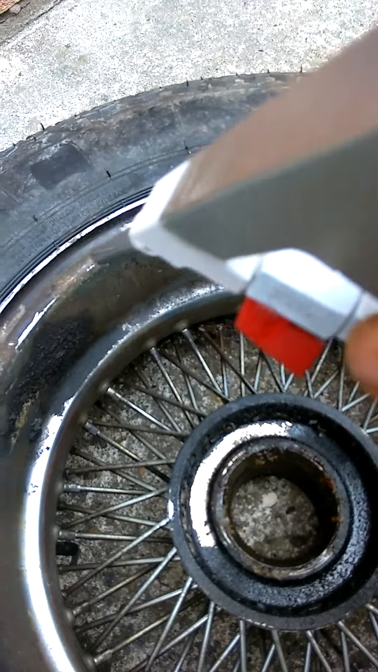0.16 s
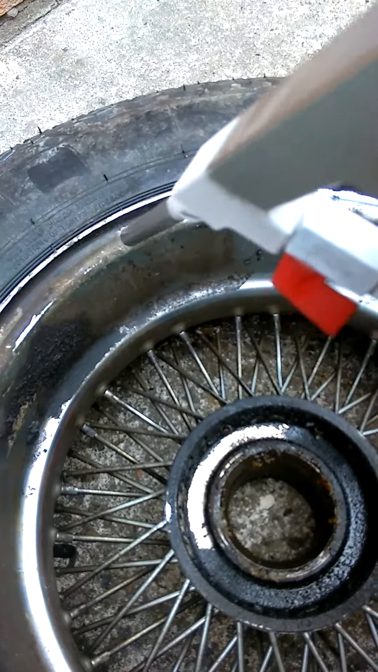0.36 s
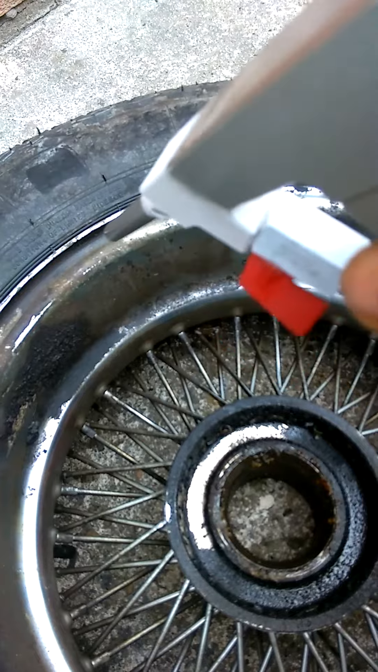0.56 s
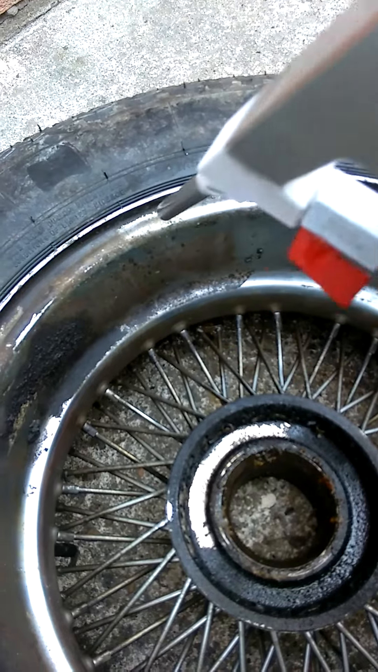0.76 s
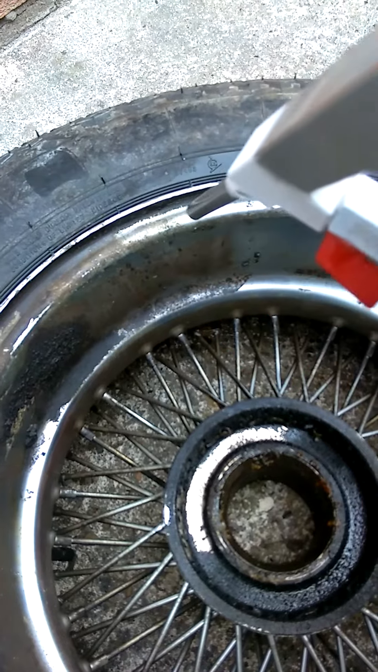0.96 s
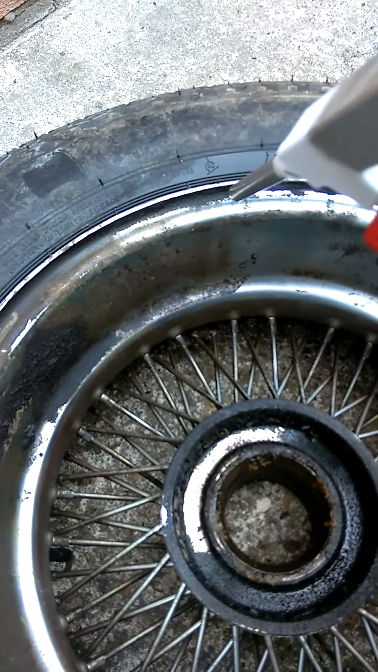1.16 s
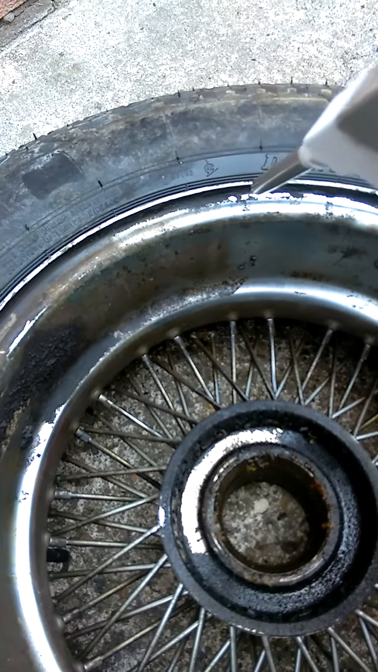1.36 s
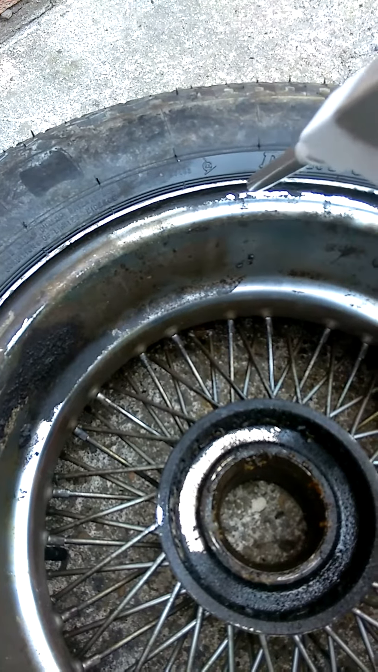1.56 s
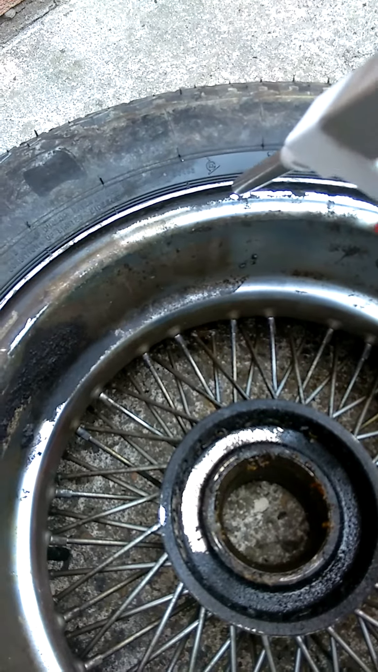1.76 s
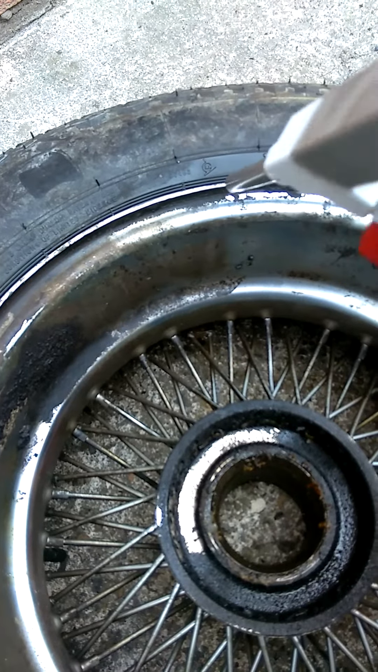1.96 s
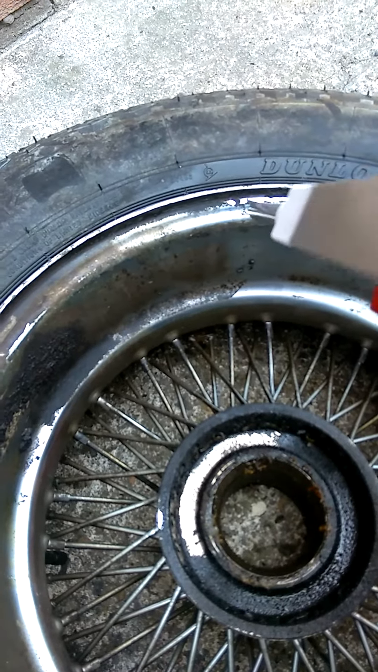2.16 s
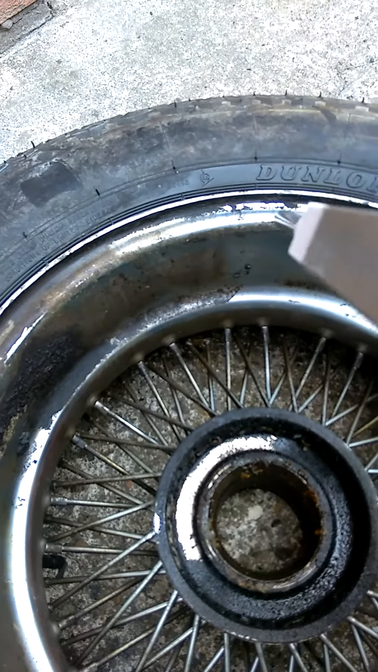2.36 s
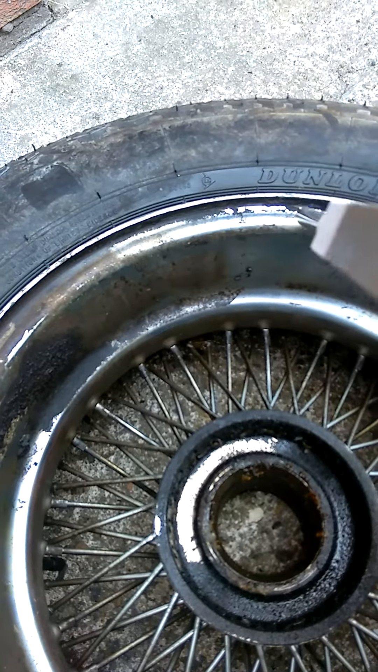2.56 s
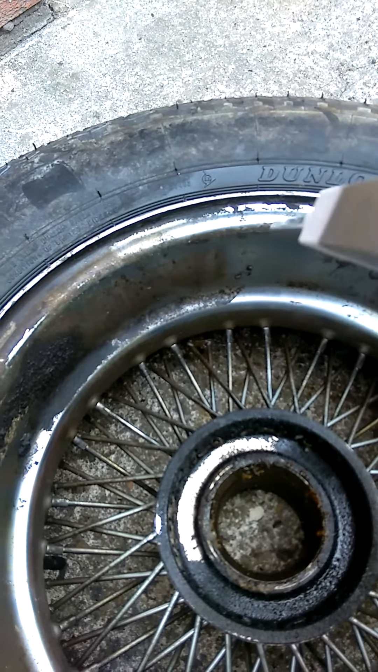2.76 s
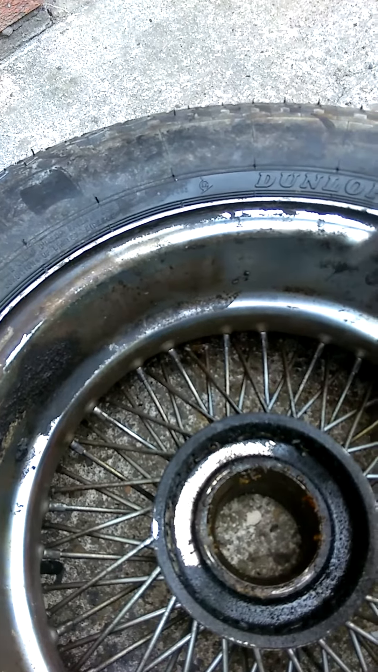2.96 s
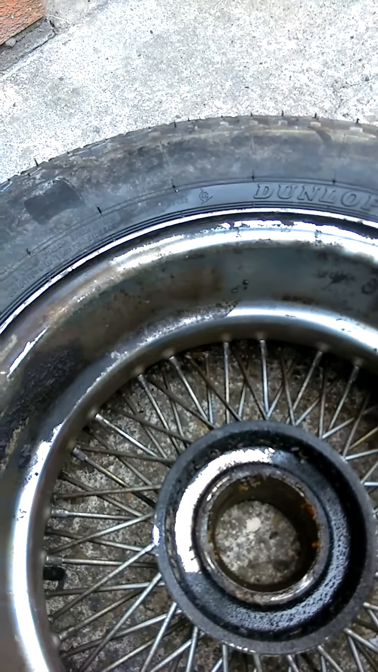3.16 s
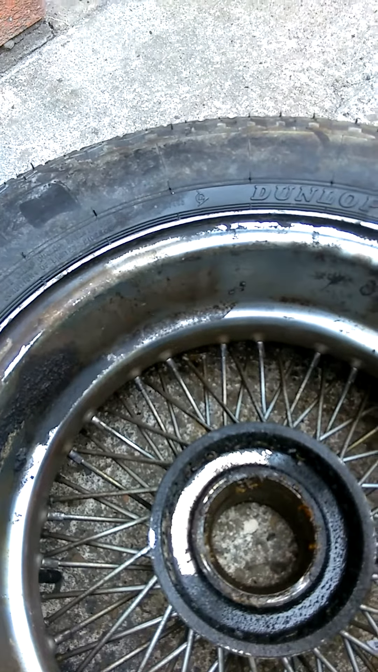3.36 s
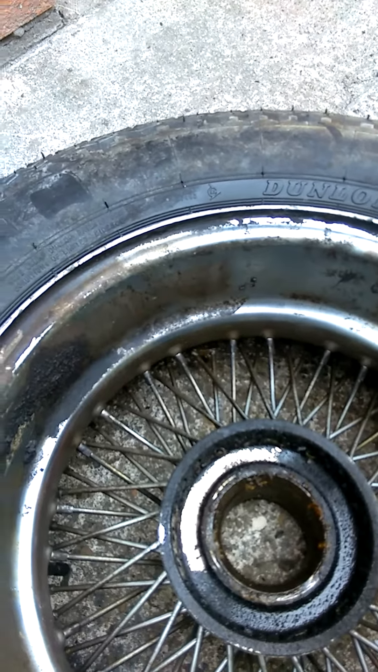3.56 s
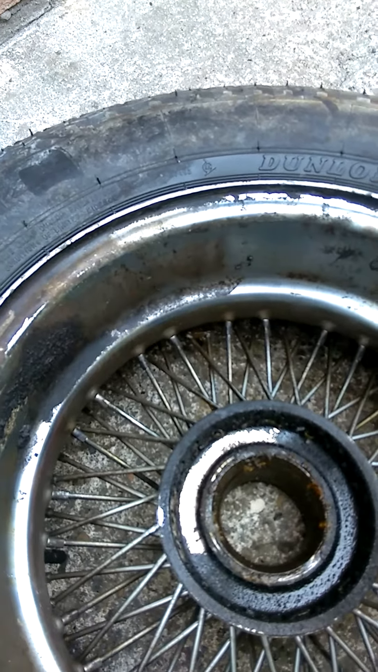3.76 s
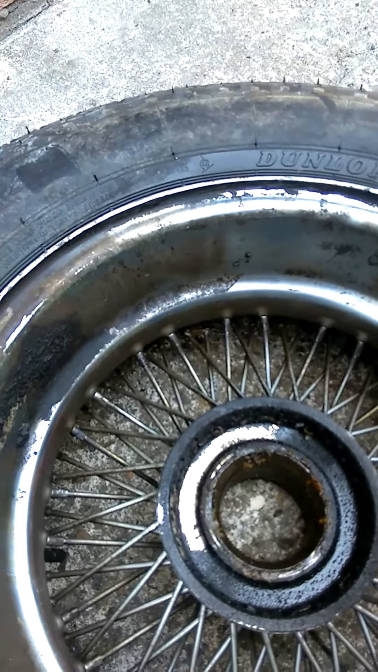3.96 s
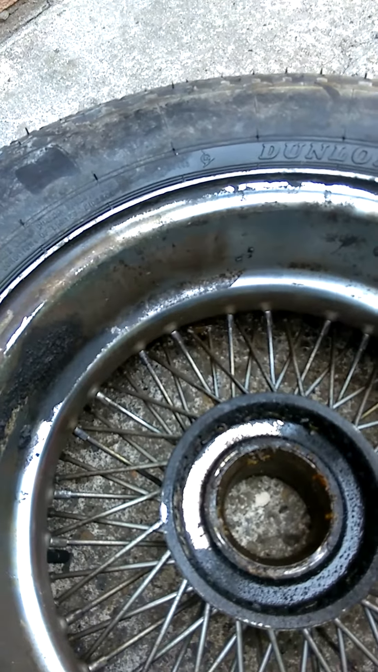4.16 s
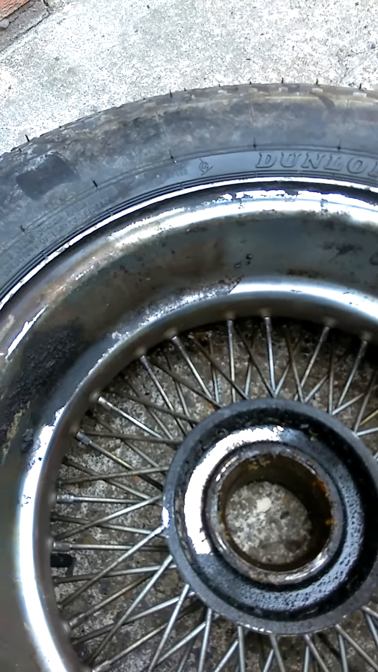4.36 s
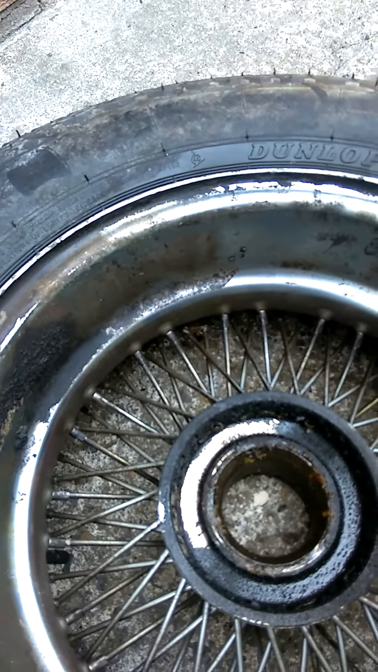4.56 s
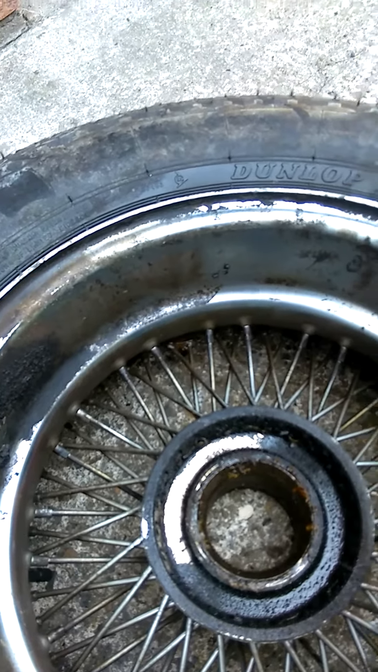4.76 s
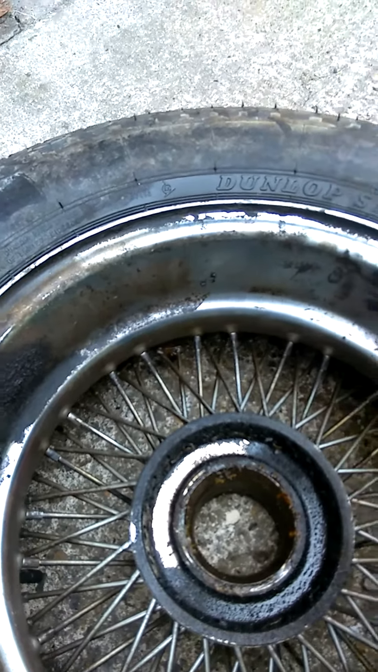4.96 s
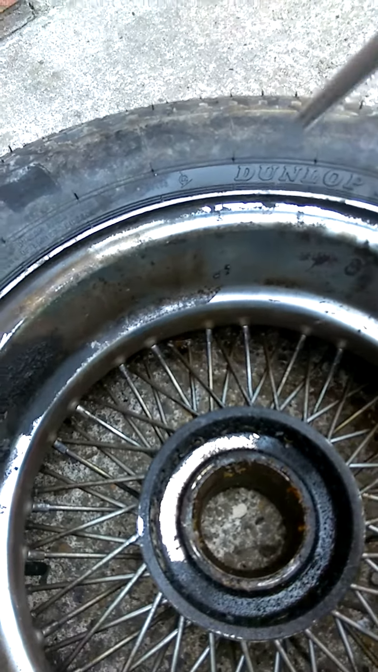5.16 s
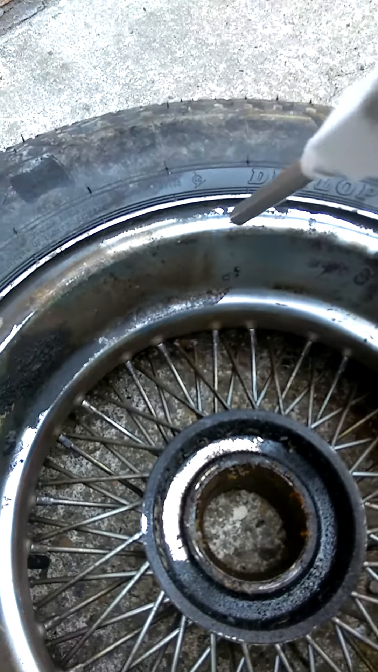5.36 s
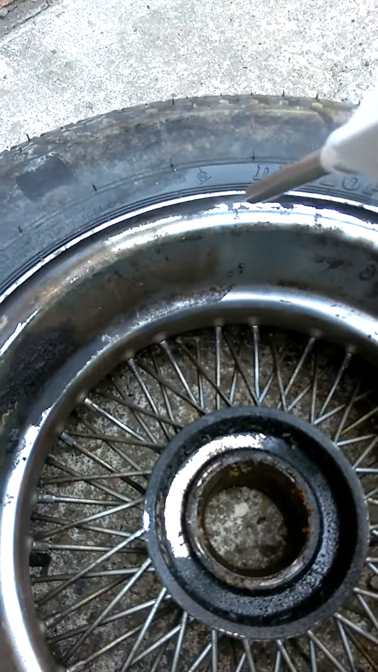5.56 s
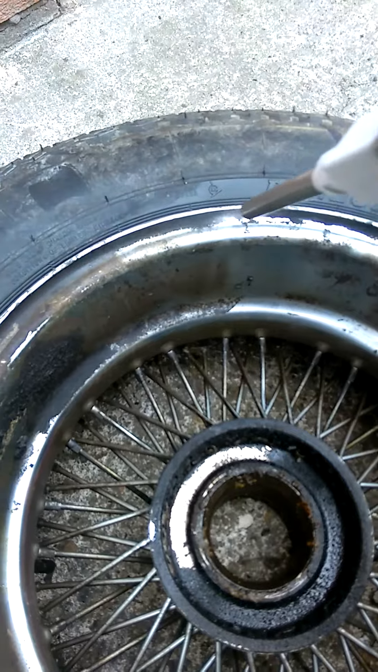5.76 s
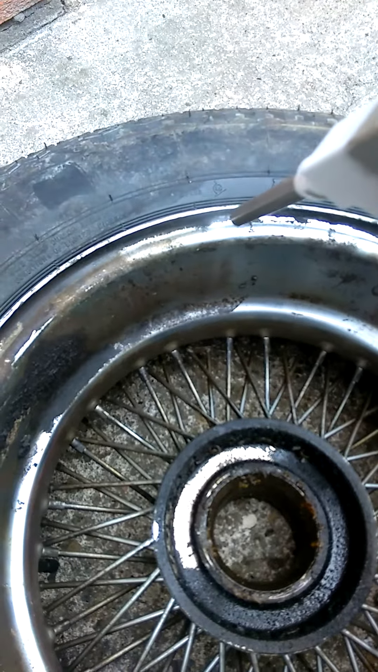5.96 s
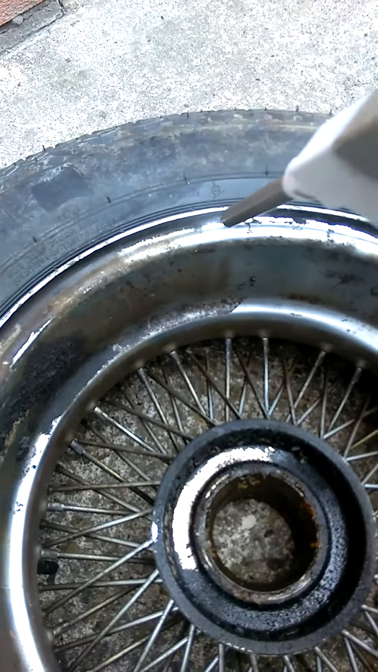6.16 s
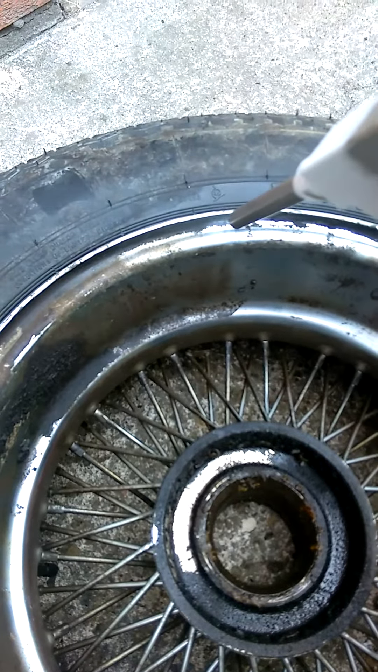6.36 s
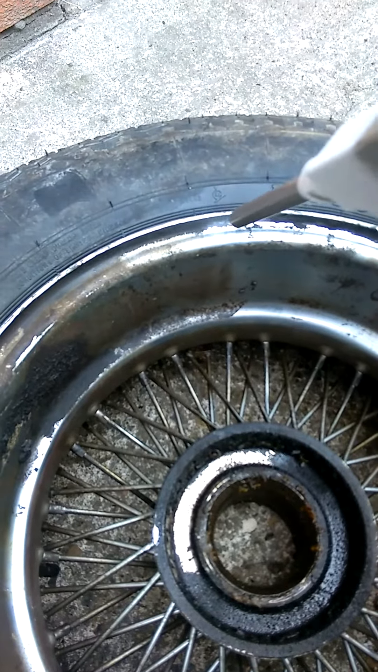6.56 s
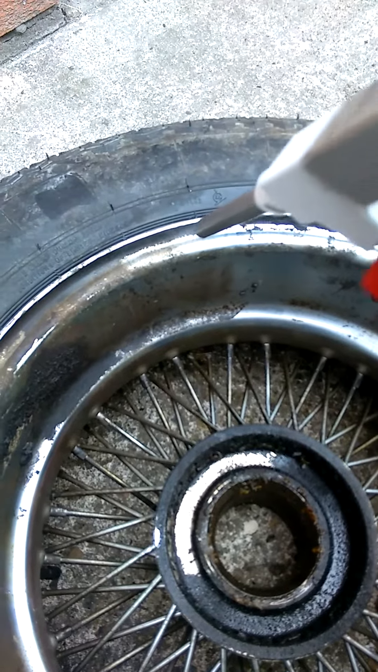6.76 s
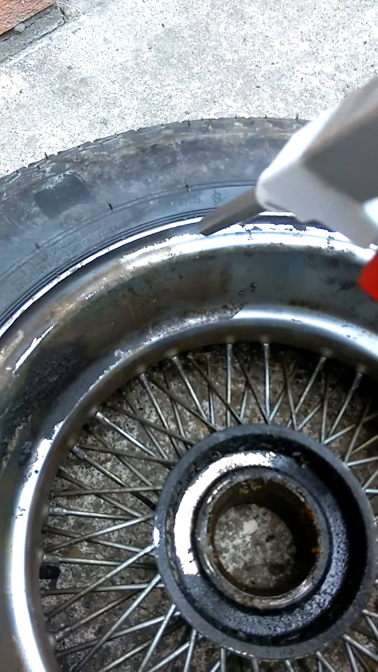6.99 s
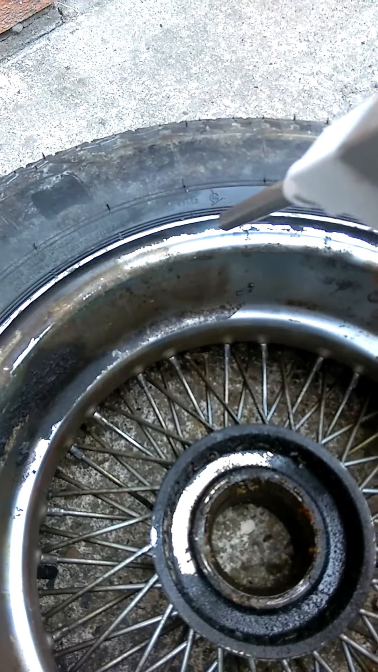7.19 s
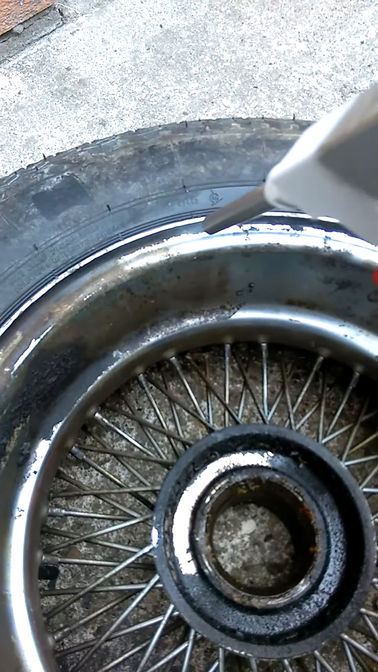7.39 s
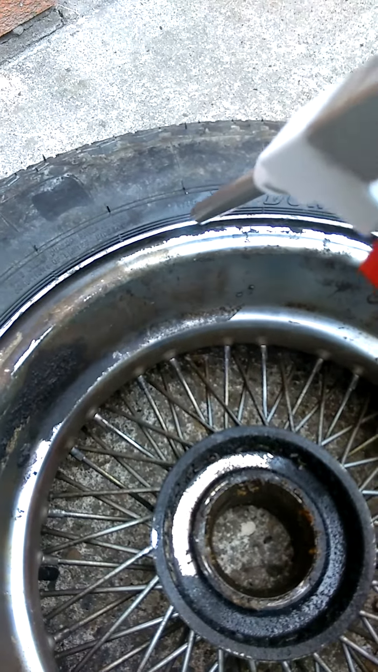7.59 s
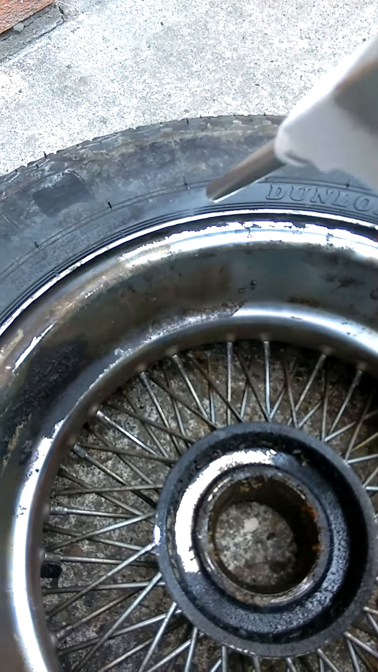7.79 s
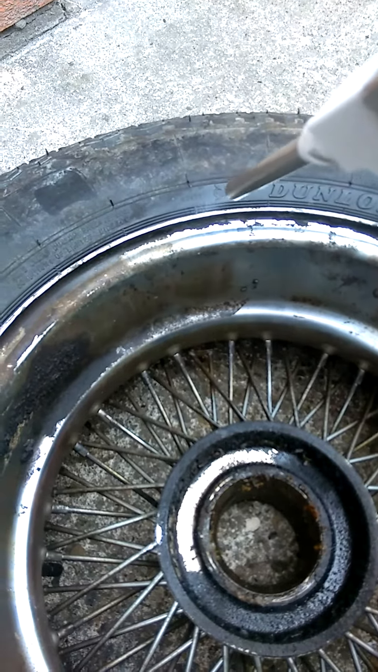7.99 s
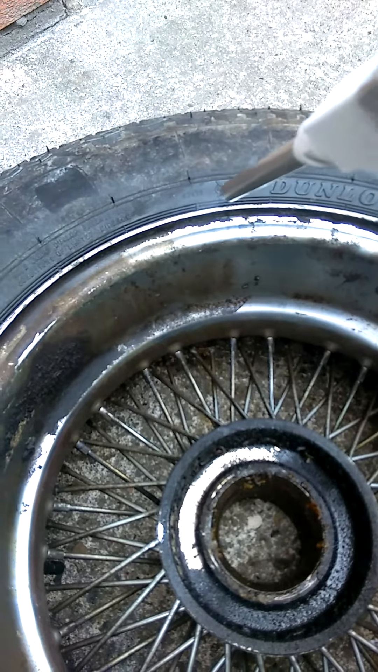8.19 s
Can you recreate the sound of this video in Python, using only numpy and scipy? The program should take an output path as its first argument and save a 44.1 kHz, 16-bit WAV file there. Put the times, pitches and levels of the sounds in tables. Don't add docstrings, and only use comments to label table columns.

```python
import sys
import numpy as np
from scipy import signal
from scipy.io import wavfile
from scipy.ndimage import uniform_filter1d

SR = 44100
rng = np.random.default_rng(int(sys.argv[2]) if len(sys.argv) > 2 else 0)


def natural_amplitude(level_db):
    exponent = np.asarray(level_db, float) / 20
    return 10 ** exponent


def generate_wav(sig):
    pcm = np.round(np.clip(np.atleast_2d(sig).T, -1, 1) * 32767).astype(np.int16)
    wavfile.write(sys.argv[1], SR, pcm)


N = 362943

# (opens [s], share of rim colour [0-1], whistle of the free jet [dB])
PULLS = [
    (0, 0.1, 3),
    (4.74, 0, 1),
    (5.29, 0.96, -1),
]
# (time [s], force over gain-control knee [dB], aim into rim hollow as roar [dB],
# sizzle [dB], left minus right [dB])
STROKES = [
    [(0.05, 3, -7, 3, 0), (0.36, 4.5, -11, 1.5, -0.5), (0.6, 3.5, -7, 2.5, -0.5), (0.95, 7, -14, 0, 0.5),
     (1.3, 5.5, -10.5, 1.5, 3.5), (1.52, 7.5, -9.5, 0, -0.5), (1.71, 3.5, -7, 3, -0.5),
     (1.9, 8.5, -8, 0.5, 0), (2.2, 6, -11.5, 0, 0), (2.55, 6, -15.5, .5, 0), (2.78, 7.5, -13, -1, 1),
     (2.84, 1.5, -9, 1.5, 1), (2.93, 4, -16.5, 1, 0)],
    [(4.76, -24, 0, 3, 1), (4.816, -6, -9, -2, 4), (4.85, 0.5, -11, 2, 2), (4.885, 6, -20, 10.5, 3),
     (4.905, 13, -16, 5, 4), (4.915, 2, -23, 6, 5), (4.94, 2, -18, 3, 0), (4.965, -2.5, -13, -4, -1),
     (4.992, -12, -10, 1, 0)],
    [(5.295, 3.5, 1, 5, -2), (5.32, 8, -8.5, 3.5, -1), (5.41, 11.5, -6.5, 1.5, -2.5),
     (5.57, 10.5, -9, 2.5, -3), (5.67, 13.5, -6.5, -1, -4.5), (5.8, 9.5, -5, 2, -2),
     (6.3, 8.5, -6.5, 2.5, -2.5), (6.85, 2, -1.5, 2, -1), (7.46, 0, 1, 3, -2), (7.66, 5, -3.5, 0.5, -2.5),
     (7.9, -1.5, -2, 3, -1.5), (8.05, 4, -5, 2, -1.5), (8.22, 5, -8.5, -2, -2.5)],
]
# (time [s], depth [dB])
STUTTERS = [
    (0.2, 1),
    (0.5, 3.5),
    (2.052, 1),
    (5.77, 1.5),
    (6.458, 3),
]
# (frequency [Hz], left [dB per Hz], right [dB per Hz])
JET_COLOUR = [(540, -89, -67.5), (830, -48, -53.5), (1310, -54, -50), (1870, -47, -55),
              (2413, -51.5, -42.5), (2790, -50.5, -55), (3290, -52, -48), (3770, -62.5, -50),
              (5850, -54.5, -60), (6460, -57.5, -54.5), (8900, -55.5, -54), (10700, -50.5, -55.5),
              (11500, -52, -51), (15700, -54, -56.5)]
# (frequency [Hz], share common to both ports [0-1])
JET_COHERENCE = [(400, .7), (1500, .97), (2200, .9), (2600, .75), (3500, .66), (6600, .66), (7300, .45),
                 (8000, .72), (12000, .76), (15000, .68)]
# (frequency [Hz], width [Hz], left [dB], right [dB])
RIM_MODES = [(1170, 130, -5, -1), (1425, 114, 9, 1.5), (1846, 134, -3.5, -11), (2100, 100, 9, 2.5),
             (2820, 110, 9, -4), (3370, 420, -3.5, -1.5), (4500, 700, 1, 1), (5600, 150, -1, -1),
             (6420, 420, 0, 0)]
LEFT_PATHS = [(18, 1, .4), (12, .7, .45), (21, -.6, .45), (91, .65, .5), (97, -.75, .5), (94, .5, .6),
              (80, .35, .6), (102, .35, 1), (135, .3, 2)]
RIGHT_PATHS = [(0, 1, .15), (47, .3, 1.5), (78, -.35, 1), (115, .35, 1.5), (30, .25, 1.5)]
# (time [s], factor [ratio])
PATH_SPREAD = [(2.9, 1), (4.7, .28), (5.1, .28), (5.28, 1)]
# (time [s], frequency [Hz], share [0-1])
TYRE_GAP = [(.05, 3300, .2), (.14, 3300, .9), (.3, 3200, 0), (.65, 2900, .2), (.78, 2720, .8),
            (.95, 2850, .2), (1.22, 2960, .95), (1.8, 2960, .75), (2.1, 2950, .35), (2.55, 2930, .85),
            (2.8, 2940, .7), (2.9, 2940, .2), (8.2, 2900, .25)]
# (start [s], end [s], frequency [Hz], left [dB], right
# [dB])
GLINTS = [(2.5, 2.82, 5050, 3, 3), (.9, 1.45, 10200, -2, 0), (.8, 1.3, 12800, -2, -2),
          (1.2, 1.75, 11200, 5, 5), (1.4, 1.68, 8300, -3, -2), (1.72, 2, 8200, 3, 2),
          (1.2, 1.75, 13200, 3, 3), (1.15, 1.5, 6300, 2, 2), (2.1, 2.5, 9200, 3, 0),
          (2.1, 2.5, 12300, 0, 3), (2.45, 2.9, 11500, 3, 3), (2.5, 2.85, 6800, 3, 0),
          (.2, .5, 6000, -3, -3), (4.75, 5, 13800, 4, 2), (4.75, 5, 11000, -3, -1),
          (4.75, 5, 15200, -3, -3), (4.75, 5, 2350, -3, -4), (4.75, 5, 4300, 4, 2), (4.75, 5, 3700, 3, 1),
          (4.75, 4.92, 2700, 4, 3), (4.75, 5, 3150, 2, 1), (5.29, 5.7, 15200, -3, -3),
          (5.29, 6.4, 13600, 2, 2), (5.29, 6.4, 10600, -3, -2), (5.9, 6.4, 11800, 1, 0),
          (6.3, 6.6, 10800, -4, -3), (5.6, 6.5, 9000, 2, 2), (6.7, 7.2, 14200, 3, 1),
          (6.6, 7.3, 12300, 2, 2), (7.8, 8.1, 10500, 4, 0), (7.5, 8.2, 9700, -3, -2),
          (6.5, 8.3, 3500, 1, 2), (6.5, 8.3, 4100, 1, 2), (6.5, 7.8, 2050, -2, 0), (7.7, 8.3, 13600, 2, 2),
          (7.5, 8.3, 4600, 3, 3), (5.35, 6.2, 1420, -2.5, -1.5), (5.35, 6.2, 2050, -2, -1),
          (2.825, 2.855, 5100, -14, -16), (2.885, 2.95, 4450, -14, -18)]
# (time [s], level [dB], frequency [Hz], t60 [s], right share [0-1])
THUMPS = [(.45, -28, 60, .3, .3), (.53, -25, 90, .15, .3), (.62, -28, 70, .2, .3), (3.81, -18, 140, .2, .9),
          (3.88, -20, 300, .12, .9), (4.13, -22, 200, .1, .9), (5.285, -14, 150, .08, .9),
          (5.358, -19, 110, .08, .2), (5.47, -25, 55, .18, .1), (5.475, -22, 220, .04, .1),
          (5.499, -17, 160, .05, .1)]
# (time [s], length [s], level [dB], frequency [Hz])
SCRAPES = [
    (3.922, 0.089, -30, 2700),
    (3.995, 0.1, -32.5, 2280),
    (4.206, 0.16, -29, 2230),
    (4.501, 0.155, -30, 2180),
    (4.673, .03, -37, 2200),
]
# (time [s], speed [turns per s])
SHAFT_SPEED = [(0.0, 29.75), (1.7, 29.96), (2.9, 30.02), (3.8, 30.09), (4.5, 29.92), (5.1, 30.06),
               (5.8, 29.74), (6.4, 30.05), (7.0, 29.86), (7.6, 29.61), (8.23, 29.71)]
# (multiple of shaft [ratio], left [dB], right [dB], left lead [rad])
SHAFT_ORDERS = [(1, -46.5, -45.0, 0.05), (2, -28.0, -27.5, 0.11), (3, -26.0, -25.5, 0.17),
                (4, -35.0, -33.0, 0.11), (5, -31.5, -34.5, 0.72), (6, -23.5, -26.5, 0.08),
                (7, -26.0, -29.0, 0.07), (8, -32.0, -31.5, -0.07), (9, -25.5, -26.5, -0.04),
                (10, -56.5, -35.0, -0.29), (11, -42.0, -41.5, 1.1), (12, -37.0, -39.5, 0.79),
                (13, -42.5, -38.5, 1.16), (14, -51.0, -47.5, 0.42), (15, -40.5, -36.5, -0.78),
                (16, -53.0, -54.5, -0.42), (17, -63.5, -55.5, 0.45), (18, -38.5, -35.0, 0.05),
                (19, -49.0, -38.0, 0.76), (20, -63.5, -41.5, 0.73), (21, -50.5, -54.0, -0.53),
                (22, -36.5, -50.5, 0.66)]
# (time [s], gain [dB])
NINTH_SWELL = [(0, 4.5), (2.9, 4.5), (3.0, 0), (5.2, 0), (5.4, 3), (8.2, 3)]
# (frequency [Hz], left [dB per Hz], right [dB per Hz])
CLATTER_COLOUR = [(40, -66, -67), (109, -61, -60), (200, -57, -58), (250, -50, -51), (300, -58, -56),
                  (351, -62, -57), (477, -68, -62), (530, -60, -58), (1010, -60.5, -63.5),
                  (1660, -62.5, -63.5), (2430, -63.5, -66), (3500, -70, -67.5), (4830, -75.5, -78),
                  (6900, -73.5, -85.5), (12300, -72, -82), (16100, -79, -86)]
# (frequency [Hz], share common to both ports [0-1])
CLATTER_COHERENCE = [(30, .99), (80, 0.94), (300, 0.96), (450, 0.3), (700, 0.68), (1500, 0.24), (3500, 0.1),
                     (15000, 0)]
# (frequency [Hz], left [power ratio], right [power ratio])
CLACK_COLOUR = [(306, 0.12, 0.02), (1200, 0.66, 0.98), (1800, 1.3, 0.44), (2510, 1.8, 0.73),
                (4000, 1.9, 0.93), (12000, 2.2, .4)]
# (frequency [Hz], t60 [s], left [dB], right [dB])
VALVE_MODES = [(1760, .028, -12.5, -23), (2000, .02, -19, -28), (1250, .04, -26, -26)]
# (time [s], gain [dB])
SLAP_GAIN = [(3.0, -4), (3.15, -1), (3.3, 0), (3.75, -.5), (3.9, -2.5), (4.85, -2.5), (5.0, -6)]
# (time [s], level [dB])
BASS_MISMATCH = [(0.15, 1), (0.3, -22), (0.4, 3), (0.74, 3), (0.86, -24), (0.95, 1), (1.8, 4), (1.95, -10),
                 (2.12, 2), (2.35, -9), (2.5, 4), (3.1, 2), (5.58, 2), (5.72, -28), (5.88, 1), (6.45, -6),
                 (6.7, 3), (7.65, 0)]

HOP, SIZE = 128, 512
T = np.arange(N) / SR
FRAME_T, HZ = np.arange(N // HOP + 5) * HOP / SR, np.fft.rfftfreq(SIZE, 1 / SR)
ROAR_USUAL_DB, SIZZLE_USUAL_DB, PAN_USUAL_DB = -4.5, -1, 2
SHUT_DB_PER_S, KNEE_DB = 600, -0.5
RUMBLE_PER_ROAR, RUMBLE_PER_FORCE, RUMBLE_DB = 1, -0.33, 0.5
SIZZLE_PER_FORCE = -0.41
FLUTTER_DB, AIM_SHAKE_DB, SIZZLE_SHAKE_DB, PAN_SHAKE_DB = 0.34, 1, 0.4, 1.1
CLUMP_S, GAP_S = 0.013, 0.031
SPUTTER_DB, SPUTTER_S = 10, 0.1
NOTCH_DB, NOTCH_HZ, NOTCH_WIDTH_HZ, NOTCH_SAG_HZ_PER_S = -22, 6150, 260, 4500
WHISTLE_HZ, WHISTLE_WIDTH_HZ = 14000, 1500
TYRE_GAP_WIDTH_HZ, TYRE_GAP_COHERENCE = 150, .97
GLINT_WIDTH, GLINT_EDGE_S = .05, .08
SCRAPE_SAG_HZ_PER_S, SCRAPE_FADE_DB_PER_S, SCRAPE_WIDTH_HZ = 1200, 13, 450
SCRAPE_AIR_DB, SCRAPE_AIR_HZ = -8, 3500
GUST_DB, GUST_HZ = 5, 80
MISMATCH_HZ, MISMATCH_SHAKE_DB = 120, 3.2
REST_DB, DUCK_SHARE, LAG_S = 0.17, 0.83, 0.021
BAND_EDGE_HZ = 15755


def jet():
    gains, rim = jet_gains()
    gap_hz, gap_share = follow(TYRE_GAP, FRAME_T)[..., None]
    gap = gap_share * np.exp(-((HZ - gap_hz) / TYRE_GAP_WIDTH_HZ) ** 4)
    to_mean = np.sqrt(gains.prod(0)) / gains
    gains = gains * to_mean ** (gap * np.clip(1.3 - rim, 0, 1))
    same = read(JET_COHERENCE, HZ) * (1 - gap) + TYRE_GAP_COHERENCE * gap
    paths = np.array([echoes(LEFT_PATHS), echoes(RIGHT_PATHS)]) * (1 - gap) + gap
    hiss = ports(gains, same, paths, SIZE, HOP)
    level = uniform_filter1d(natural_amplitude(gun(T)[0] + KNEE_DB), 40)
    return hiss * pellet_spray() * level


def jet_gains():
    force_db, aim_db, sizzle_db, pan_db, rim, whistle_db = gun(FRAME_T)[..., None]
    flutter, *shake = wander(15.0, (len(FRAME_T), 4)).T[..., None]
    push_db = np.maximum(force_db, 0)
    flutter_db = FLUTTER_DB * flutter + stutter_db(FRAME_T)[:, None]
    roar_db = aim_db + AIM_SHAKE_DB * shake[0]
    pan_db = pan_db + PAN_SHAKE_DB * shake[1]
    sizzle_db = sizzle_db + SIZZLE_PER_FORCE * push_db + SIZZLE_SHAKE_DB * shake[2]
    sputter_db, notch_db = first_blast_end_db()

    deep = 1 / (1 + (HZ / 1220) ** 16)
    low = 1 / (1 + (HZ / 2300) ** 5)
    high = 1 / (1 + (10000 / (HZ + 1)) ** 7)
    rumble_db = RUMBLE_DB + RUMBLE_PER_ROAR * aim_db + RUMBLE_PER_FORCE * push_db + sputter_db
    field_db = deep * rumble_db + (low - deep) * (roar_db - ROAR_USUAL_DB)
    field_db = field_db + high * (sizzle_db - SIZZLE_USUAL_DB)
    field_db = field_db + (1 - 0.21 * low) * flutter_db
    field_db = field_db + turbulence_db(low)
    whistle = np.exp(-((HZ - WHISTLE_HZ) / WHISTLE_WIDTH_HZ) ** 2)
    field_db = field_db + glints_db() + notch_db + whistle_db * whistle + rim * rim_db()
    side_db = np.array([.5, -.5])[:, None, None] * (pan_db - PAN_USUAL_DB) * (1 - low)
    bass_cut = 1 + (450 / (HZ + 1)) ** 3
    return natural_amplitude(read(JET_COLOUR, HZ)[:, None] + field_db + side_db) / bass_cut, rim


def gun(t):
    out = np.zeros((6, len(t)))
    out[0] = -90
    for (opens_s, rim, whistle_db), rows in zip(PULLS, STROKES):
        force_db, *rest = follow(rows, t)
        force_db = force_db - SHUT_DB_PER_S * np.maximum(t - rows[-1][0], 0)
        pull = [np.maximum(force_db, -90), *rest, rim + 0 * t, whistle_db + 0 * t]
        out = np.where(t >= opens_s, pull, out)
    return out


def stutter_db(t):
    out = np.zeros(len(t))
    for s, db in STUTTERS:
        surge = np.exp(-((t - s + CLUMP_S) / CLUMP_S) ** 2)
        dip = np.exp(-((t - s - GAP_S / 2) / GAP_S) ** 2)
        out += db * (surge - dip)
    return out


def first_blast_end_db():
    closing_s = FRAME_T[:, None] - STROKES[0][-1][0] + SPUTTER_S
    sputter = np.clip(closing_s / 0.027, 0, 1) * (FRAME_T[:, None] < PULLS[1][0])
    notch_hz = NOTCH_HZ - NOTCH_SAG_HZ_PER_S * closing_s
    notch = np.exp(-((HZ - notch_hz) / NOTCH_WIDTH_HZ) ** 2)
    return SPUTTER_DB * sputter, NOTCH_DB * sputter * notch


def turbulence_db(low):
    shape = (len(FRAME_T), len(HZ))
    patches = evened(uniform_filter1d(wander(7.1, shape), 5, 1))
    bands = evened(uniform_filter1d(wander(0.44, shape), 3, 1))
    shiver_db = 0.5 * wander(40.0, (len(FRAME_T), 1)) + 0.73 * wander(70., (len(FRAME_T), 1))
    return 1.2 * patches + 1.1 * bands * np.clip(1 - low, 0, 1) + shiver_db


def rim_db():
    out = np.zeros((2, 1, len(HZ)))
    for hz, width_hz, *db in RIM_MODES:
        out += np.reshape(db, (2, 1, 1)) * np.exp(-((HZ - hz) / width_hz) ** 2)
    return out


def glints_db():
    start, end, hz, *db = np.transpose(GLINTS)
    edge_s, t = np.minimum(GLINT_EDGE_S, (end - start) / 4), FRAME_T[:, None]
    on = np.clip(np.minimum(t - start, end - t) / edge_s + .5, 0, 1)
    bands = np.exp(-((HZ - hz[:, None]) / (GLINT_WIDTH * hz[:, None])) ** 2)
    return (on * np.array(db)[:, None]) @ bands


def echoes(ways):
    delay, strength, drift = np.transpose(ways)
    delay = delay + drift * wander(2.2, (len(FRAME_T), len(ways)))
    delay = delay * follow(PATH_SPREAD, FRAME_T).T
    comb = sum(g * np.exp(-2j * np.pi * HZ * d[:, None] / SR) for g, d in zip(strength, delay.T))
    return comb / np.linalg.norm(strength)


def pellet_spray():
    sizes = natural_amplitude(1.1 * np.minimum(rng.exponential(1, N), 4))
    hits = sizes * (rng.random(N) < 1500 / SR)
    spray = 1 + 0.027 * uniform_filter1d(signal.lfilter([1], [1, -.93], hits), 12)
    return spray / np.sqrt(np.mean(spray ** 2))


def thumps():
    out, t = np.zeros((2, N)), T[:SR // 4]
    for s, db, hz, t60, right in THUMPS:
        swing = natural_amplitude(db - 60 * t / t60) * np.minimum(2 * t * hz, 1) * np.sin(2 * np.pi * hz * t)
        part = out[:, round(s * SR):][:, :len(t)]
        part += swing * [[1], [-right]]
    return out / natural_amplitude(gain_db())


def feeder():
    out = np.zeros(N)
    r = np.exp(-np.pi * SCRAPE_WIDTH_HZ / SR)
    for s, length_s, db, top_hz in SCRAPES:
        t = np.arange(0, length_s, 1 / SR)
        noise = rng.standard_normal((3, SR // 4))
        lumps = natural_amplitude(3.5 * evened(uniform_filter1d(noise[0], 300)))[:len(t)]
        turn = np.exp(2j * np.pi * np.cumsum(top_hz - SCRAPE_SAG_HZ_PER_S * t) / SR)
        base = lumps * noise[1, :len(t)] / turn
        for _ in range(2):
            base = signal.lfilter([1 - r], [1, -r], base)
        ring = (turn * base).real
        air = signal.lfilter(*signal.butter(2, SCRAPE_AIR_HZ, "high", fs=SR), noise[2, :len(t)])
        scrape = evened(ring) + natural_amplitude(SCRAPE_AIR_DB) * evened(air)
        fade = natural_amplitude(db - SCRAPE_FADE_DB_PER_S * t) * signal.windows.tukey(len(t), .3)
        out[round(s * SR):][:len(t)] += scrape * fade
    return out * natural_amplitude(np.array([[-3.], [1.5]]))


def compressor():
    turns = .66 + np.cumsum(follow(SHAFT_SPEED, T)[0]) / SR
    return drone(turns) + valve(turns) * natural_amplitude(follow(SLAP_GAIN, T)[0]) + clatter_and_clack(turns)


def drone(turns):
    out = np.zeros((2, N))
    for k, left_db, right_db, lead_rad in SHAFT_ORDERS:
        waver_db = 1.1 * wander(6.0, len(FRAME_T))
        if k == 9:
            waver_db = waver_db + follow(NINTH_SWELL, FRAME_T)[0]
        waver = natural_amplitude(np.interp(T, FRAME_T, waver_db))
        smear_rad = 2.2 + 3.6 * ((k - 5.3) / 3.7) ** 4
        phase = 2 * np.pi * k * (turns - .05) + smear_rad + np.array([[lead_rad], [0]])
        out += natural_amplitude(np.array([[left_db], [right_db]])) * [[1], [-1]] * waver * np.cos(phase)
    return out


def valve(turns):
    slaps, t = np.diff(np.floor(turns - .03), prepend=0) > 0, T[:2000]
    jitter, size = rng.uniform(0, 1, (2, len(VALVE_MODES), N))
    out = np.zeros((2, N))
    for k, (hz, t60, left_db, right_db) in enumerate(VALVE_MODES):
        ring = natural_amplitude(-60 * t / t60) * np.minimum(t / 0.002, 1) * np.sin(2 * np.pi * hz * t)
        train = np.zeros(N + 40)
        late = (40 * jitter[k, slaps]).astype(int)
        train[np.flatnonzero(slaps) + late] = natural_amplitude(-7 * size[k, slaps])
        out += natural_amplitude(np.array([[left_db], [right_db]])) * signal.oaconvolve(train, ring)[:N]
    return out


def clatter_and_clack(turns):
    hz, lumps = np.fft.rfftfreq(1024, 1 / SR), wander(11.0, (N // 256 + 5, 1))
    lump_gain = natural_amplitude(GUST_DB * lumps / (1 + (hz / GUST_HZ) ** 2))
    colour = natural_amplitude(read(CLATTER_COLOUR, hz))[:, None] * lump_gain / (1 + (45 / (hz + 1)) ** 2)
    same = read(CLATTER_COHERENCE, hz)
    paths = np.exp(-2j * np.pi * hz * np.array([[[3.]], [[0]]]) / SR)
    clatter = ports(colour, same, paths, size=1024, hop=256)
    clack_colour = colour * np.sqrt(abs(read(CLACK_COLOUR, hz)))[:, None]
    clack = ports(clack_colour, same, paths, size=1024, hop=256)
    strength = natural_amplitude(2.2 * rng.uniform(-1, 1, 400))[turns.astype(int)]
    u = turns % 1
    gate = np.sqrt(np.minimum(u / .06, 1) * (np.exp(-u / .08) * 2.2 + .25 * np.exp(-u / .35)))
    gusts = natural_amplitude(np.interp(T, FRAME_T, .9 * wander(8., len(FRAME_T))))
    return natural_amplitude(0.3) * clatter * gusts + natural_amplitude(1.9) * clack * gate * strength


def ports(gains, same, paths, size, hop):
    a, b = rng.standard_normal((2, 3) + gains.shape[1:]) / np.sqrt(2)
    common, own = a[0] + 1j * b[0], a[1:] + 1j * b[1:]
    share = np.sqrt(np.clip(same, 0, 1))
    z = share * paths * common * [[[-1]], [[1]]] + np.sqrt(1 - share ** 2) * own
    scale = np.sqrt(SR * 3 / size)
    spectra = (z * gains).transpose(0, 2, 1)
    return scale * signal.istft(spectra, nperseg=size, noverlap=size - hop)[1][:, :N]


def gain_db():
    force_db, _, sizzle_db, *_ = gun(T)
    over_db, r = np.maximum(force_db + sizzle_db, 0), np.exp(-1 / (LAG_S * SR))
    late_db = signal.lfilter([1 - r], [1, -r], over_db, zi=[r * over_db[0]])[0]
    return REST_DB - DUCK_SHARE * late_db


def evened(x):
    return x / np.sqrt(np.mean(x ** 2) + 1e-20)


def read(table, hz):
    f, *columns = np.transpose(table)
    return np.array([np.interp(np.log(hz + 1), np.log(f), c) for c in columns])


def follow(rows, t):
    s, *columns = np.transpose(rows)
    return np.array([np.interp(t, s, c) for c in columns])


def wander(rate_hz, shape):
    width = max(int(SR / HOP / rate_hz), 1)
    noise = rng.standard_normal(shape)
    return evened(uniform_filter1d(uniform_filter1d(noise, width, 0), width, 0))


def scene():
    gun_sound, bed = jet(), compressor()
    left_over = signal.filtfilt(*signal.butter(3, MISMATCH_HZ, fs=SR), bed.mean(0))
    mismatch_db = follow(BASS_MISMATCH, FRAME_T)[0] + MISMATCH_SHAKE_DB * wander(22., len(FRAME_T))
    bed = bed + left_over * (natural_amplitude(np.interp(T, FRAME_T, mismatch_db)) - 1)
    return gun_sound + bed + feeder() + thumps()


def band_limit(x):
    return signal.sosfilt(signal.butter(12, 16950, fs=SR, output="sos"), x)


def record(dry):
    ducked = 1.142 * np.tanh(dry * natural_amplitude(gain_db()) / 1.419)
    edge = signal.firwin(2401, BAND_EDGE_HZ, window=("kaiser", 9), fs=SR)
    mix = signal.oaconvolve(ducked, edge[None], "same", axes=1)
    return band_limit(mix)


dry = scene()
out = record(dry)
generate_wav(out)
```